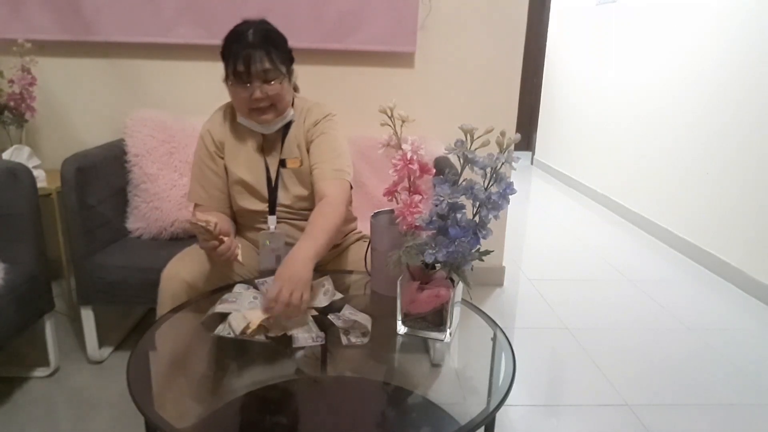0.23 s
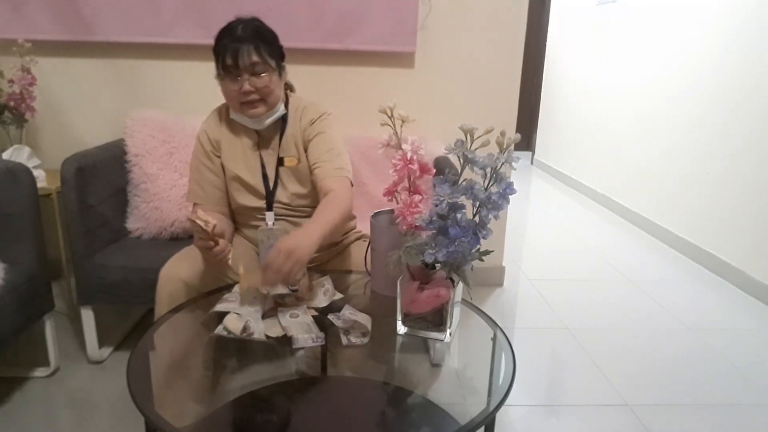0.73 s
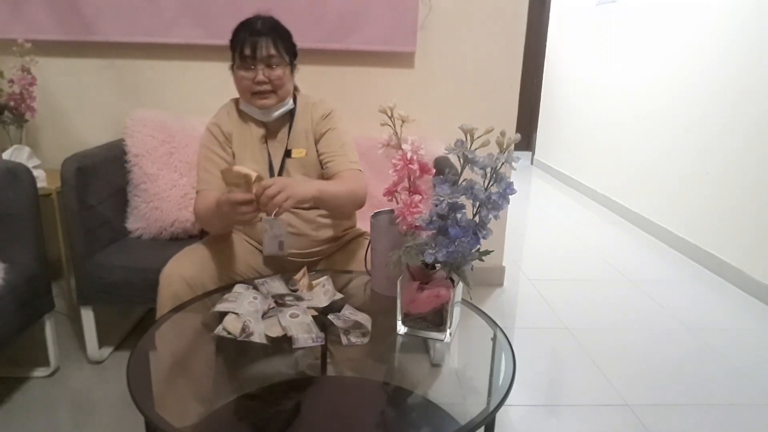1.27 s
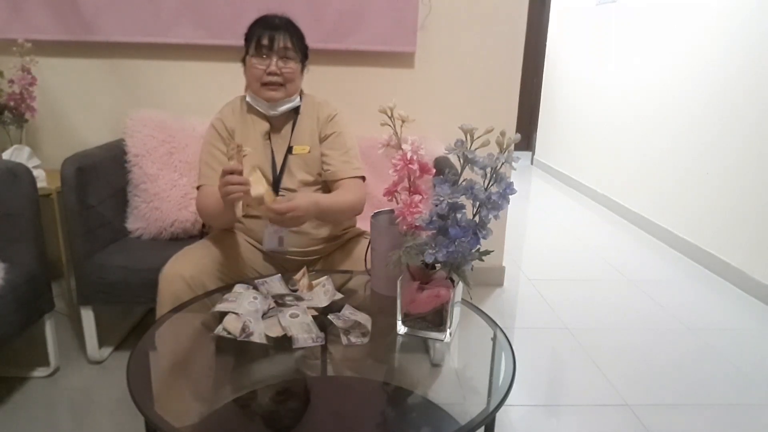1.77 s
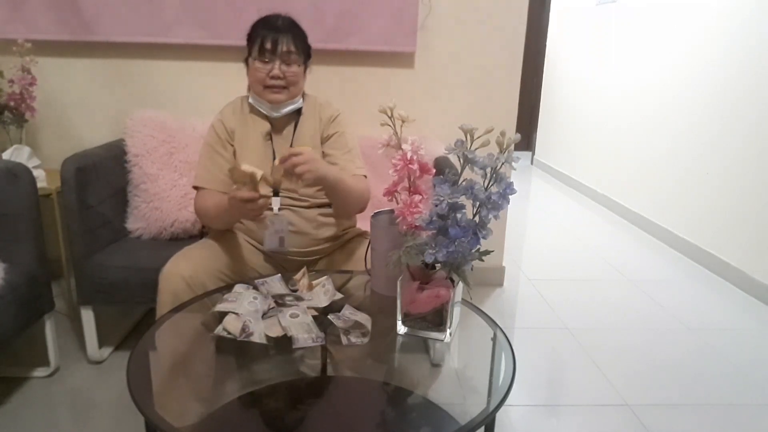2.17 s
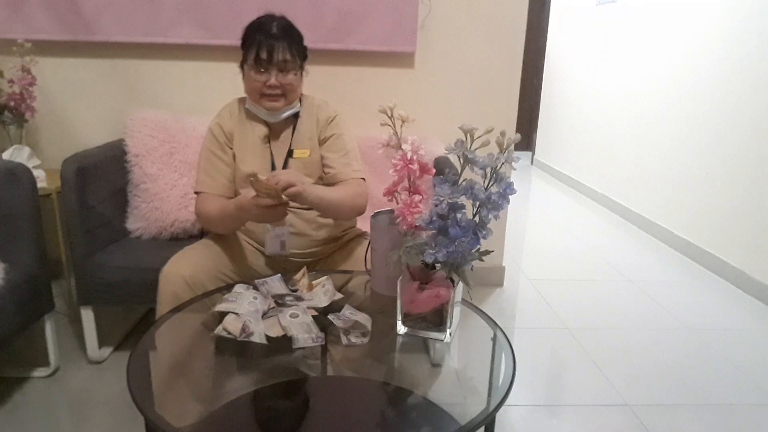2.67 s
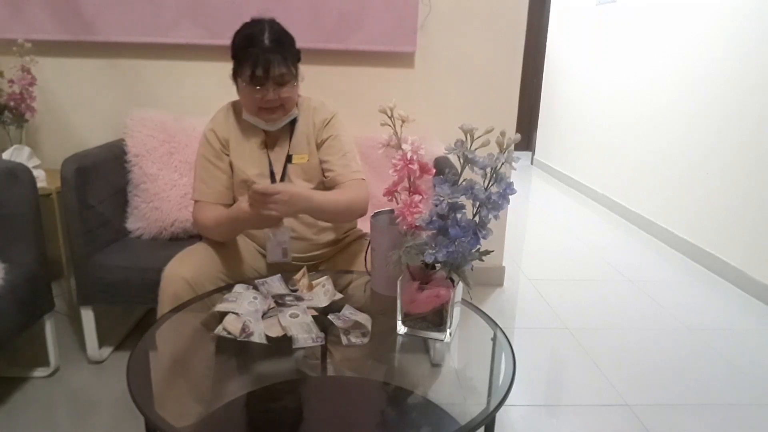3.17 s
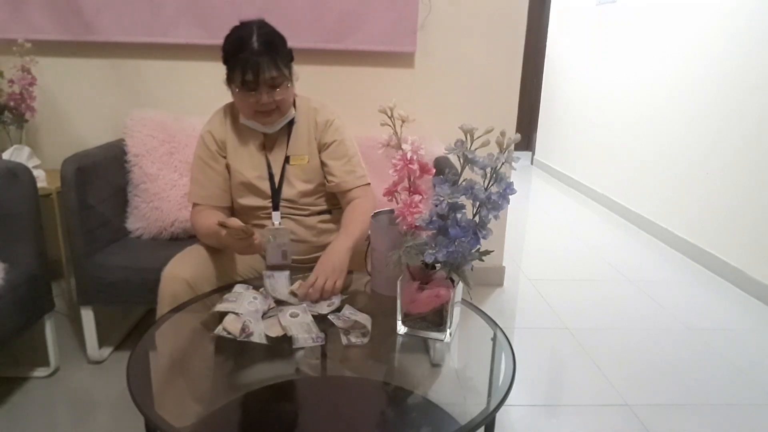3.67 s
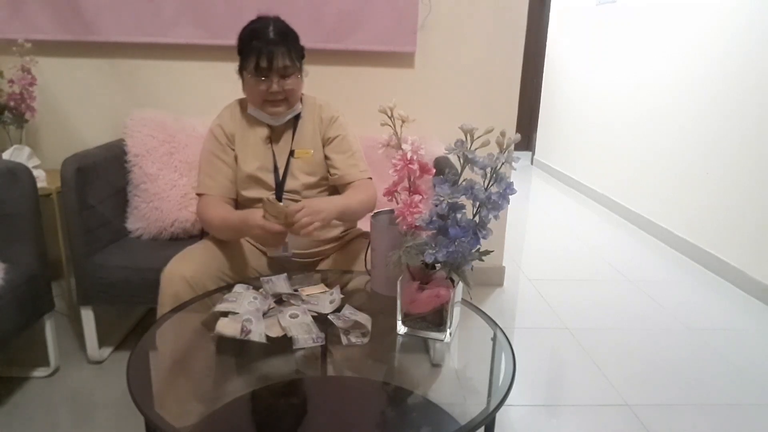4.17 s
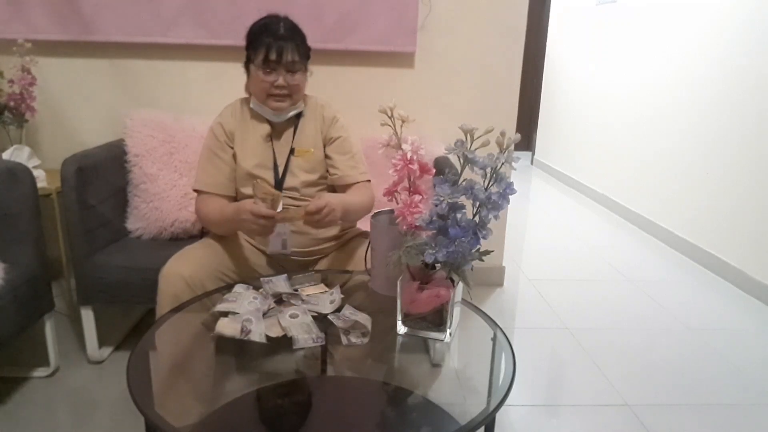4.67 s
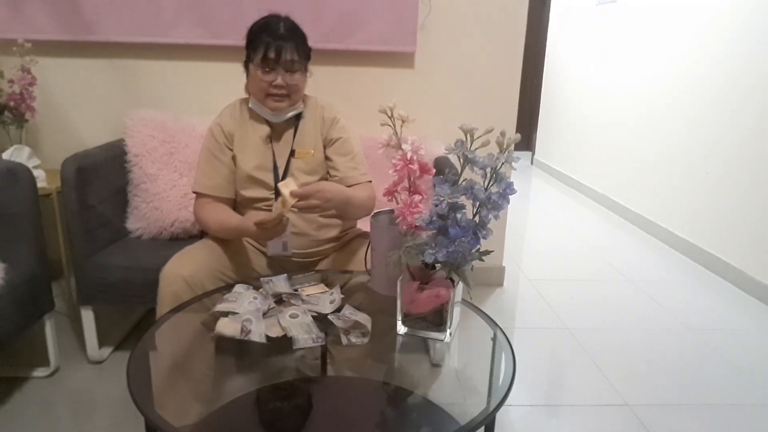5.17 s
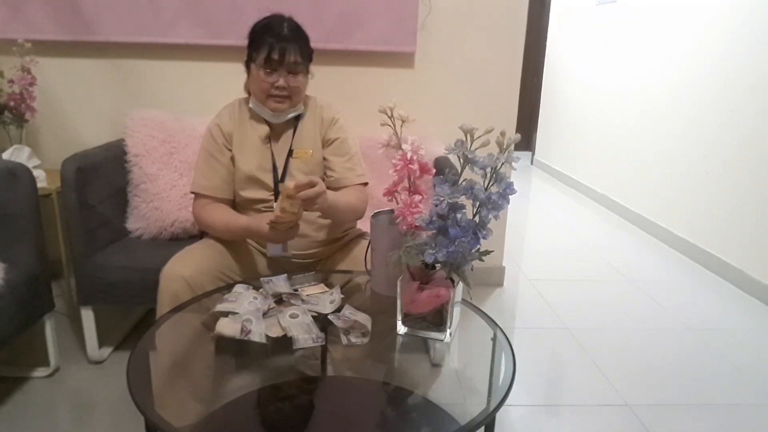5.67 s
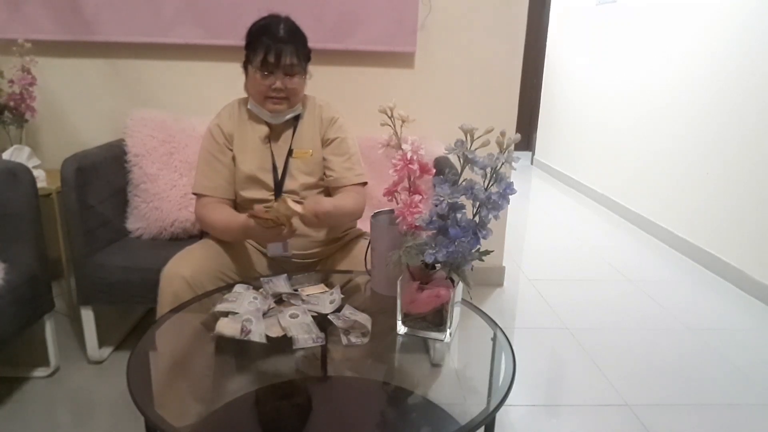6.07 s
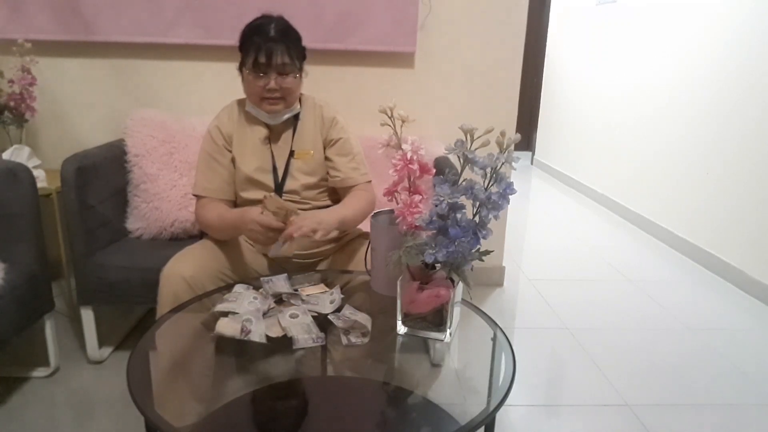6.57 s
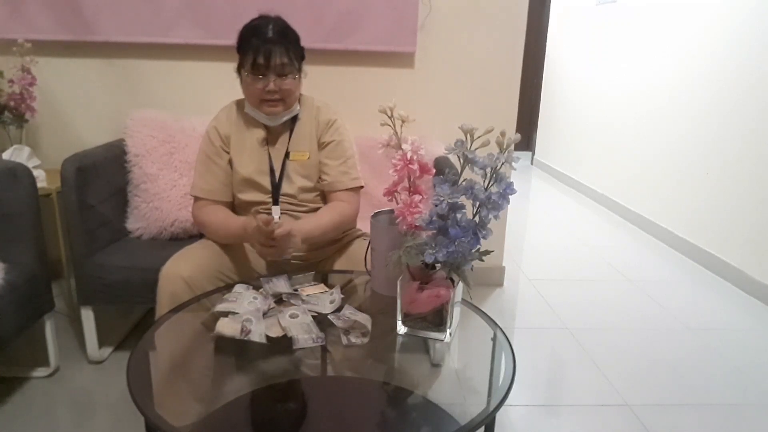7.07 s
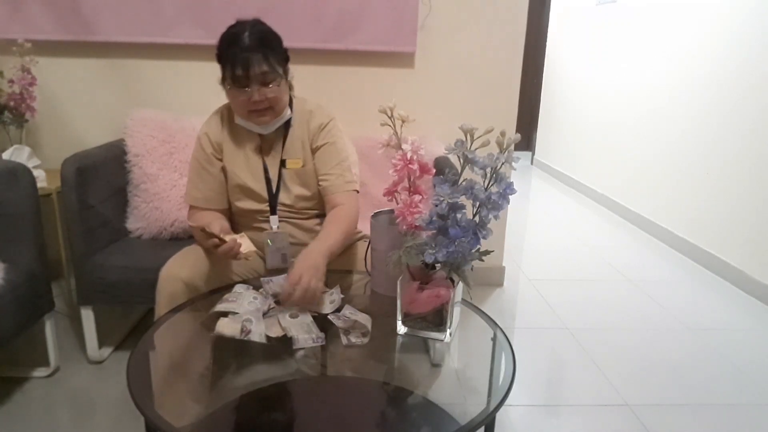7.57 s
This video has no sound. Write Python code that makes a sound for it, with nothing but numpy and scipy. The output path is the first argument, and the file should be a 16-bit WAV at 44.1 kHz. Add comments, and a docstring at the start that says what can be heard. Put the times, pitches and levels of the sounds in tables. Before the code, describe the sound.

Indoors in a hard, bare room, someone counts banknotes: short papery slides, fine crackle and sharp crease snaps in uneven rhythm. The busiest, loudest flurry comes early, with soft low thumps of the hand on table or bundle; later strokes are gentler with small gaps. Quiet air rush and a low drone continue throughout, heard at modest distance in mono.

```python
"""Bare tiled room: hands sort and count paper banknotes over a glass table, some steps from a mono microphone.
Notes slide and crumple (friction noise and crackle in four registers), creases snap (noise bursts ringing paper
panels), a hand bumps now and then (pushes ringing low modes); decaying noise tails make the room ring after each.
Underneath: the rush of ventilation and a low drone (filtered noise), and a wavering hum (two beating tones)."""
import sys
import numpy as np
from scipy import signal
from scipy.fft import rfft, irfft, next_fast_len
from scipy.io import wavfile
from scipy.ndimage import uniform_filter1d

SR = 44100
rng = np.random.default_rng(int(sys.argv[2]) if len(sys.argv) > 2 else 0)


def transcribe(u):
    """Save the signal u as a 16-bit wav file named by the first command-line argument.

    u: samples, shape (n,) or (channels, n), limited to [-1, 1]; the rate is SR.
    q: integer samples, one column per channel.
    """
    v = np.clip(np.atleast_2d(u).T, -1, 1)
    q = np.round(v * 32767).astype(np.int16)
    wavfile.write(sys.argv[1], SR, q)


N = 344421


def amp(db):
    """Amplitude factor of a level in dB."""
    return 10 ** (np.asarray(db) / 20)


def unit(x):
    """x scaled to an RMS of 1."""
    return x / np.sqrt(np.mean(x ** 2) + 1e-20)


def along(points, hz):
    """Interpolate (frequency [Hz], value) points on a log frequency axis."""
    point_hz, value = np.transpose(points)
    return np.interp(np.log(hz + 1), np.log(point_hz + 1), value)


def filtered(x, response):
    """x filtered by a complex response of frequency [Hz]."""
    m = next_fast_len(len(x) + SR // 4)
    spectrum = rfft(x, m) * response(np.fft.rfftfreq(m, 1 / SR))
    return irfft(spectrum, m)[:len(x)]


def coloured(x, colour):
    """x shaped by (frequency [Hz], level [dB]) points, at an RMS of 1."""
    return unit(filtered(x, lambda hz: amp(along(colour, hz))))


def resonances(modes, sign=-1):
    """Causal response of (Hz, width Hz, dB) modes; neighbours swing opposite unless sign is 1."""
    def response(f):
        return sum(sign ** k * amp(db) * 1j * f * width / (hz * hz - f * f + 1j * f * width)
                   for k, (hz, width, db) in enumerate(modes))
    return response


def patchy(patchy_db):
    """White noise with smooth patches of random gain in time and frequency, patchy_db RMS."""
    z = signal.stft(rng.standard_normal(N + 512), nperseg=512)[2]
    field = uniform_filter1d(rng.standard_normal(z.shape), 8, 0)
    field = uniform_filter1d(field, 16, 1)
    return signal.istft(z * amp(patchy_db * unit(field)), nperseg=512)[1][:N]


def ventilation():
    """Air rush as coloured noise, a drone of noise in narrow resonances, and a beating hum."""
    # rush spectrum: (frequency [Hz], level [dB per Hz])
    air = [(15, -71), (40, -30), (55, -1), (122, -14), (152, 3), (221, -10), (260, -6), (322, -13),
           (509, -31), (567, -34), (826, -15), (1080, -73), (2120, -47), (2300, -18.5), (2700, -39),
           (9000, -24), (15500, -44)]
    # drone modes, response squared in use: (frequency [Hz], width [Hz], level before squaring [dB])
    duct = [(67.5, 31, -5.5), (120.2, 13, 3.5), (199.2, 30, -4.5), (404, 100, -4)]
    # two close tones that beat: (frequency [Hz], RMS level [dB])
    tones = [(118, -80), (120.2, -72.5)]
    rush = coloured(patchy(patchy_db=1.0), air)
    drone = unit(filtered(patchy(patchy_db=2.5), lambda hz: resonances(duct)(hz) ** 2))
    t = np.arange(N) / SR
    hum = sum(amp(db) * np.sqrt(2) * np.sin(2 * np.pi * (hz * t + rng.random())) for hz, db in tones)
    return amp(-69) * rush + amp(-62.5) * drone + hum


def crackle(rate_per_s, spread_db):
    """Tiny creases: noise let through in bursts of a ms or two, some stronger than the rest."""
    excess_db = spread_db * np.minimum(rng.exponential(size=N), 2.5)
    sizes = (rng.random(N) < rate_per_s / SR) * amp(excess_db)
    decay = np.exp(-np.arange(400) / (0.0015 * SR))
    gate = signal.fftconvolve(sizes, decay)[:N]
    return unit(gate * rng.standard_normal(N))


def stroke_gain(start, length, hold_db, fade_db_per_s, rest_db):
    """Gain of one register: every stroke swells, holds and fades; their powers add."""
    attack_share, attack_db = 0.48, 17.5  # the first part of a stroke swells by this much
    start, length = start[:, None], length[:, None]
    t = np.arange(0, N / SR, .002)
    swell_db = attack_db * np.minimum((t - start) / (attack_share * length) - 1, 0)
    fade_db = fade_db_per_s * np.maximum(t - start - length, 0)
    shape_db = hold_db[:, None] + swell_db - fade_db
    power = (amp(shape_db) ** 2 * (t > start)).sum(axis=0) + amp(rest_db) ** 2
    return np.interp(np.arange(N) / SR, t, np.sqrt(power))


def slide():
    """Paper on paper: friction noise mixed with fine crackle, in the sheet's four registers."""
    # note on note: (start [s], length [s], flap of the whole sheet [dB], crumple of its panels [dB],
    # rustle [dB], hiss of the surface [dB])
    note_strokes = [(0.01, 0.07, -78, -60.5, -50.5, -50), (0.076, 0.054, -62, -50.5, -49, -41),
                    (0.143, 0.094, -60.5, -55, -46.5, -68), (0.457, 0.088, -59, -46, -40, -41),
                    (0.629, 0.13, -67, -54.5, -45, -47.5), (0.698, 0.059, -64.5, -52.5, -50, -43),
                    (0.837, 0.17, -65, -72, -64, -83), (1.169, 0.11, -57.5, -59, -55.5, -53.5),
                    (1.394, 0.12, -71, -64.5, -55, -51.5), (1.562, 0.075, -59.5, -53, -58, -52),
                    (1.656, 0.078, -44.5, -39.5, -38, -34), (1.856, 0.06, -48.5, -47, -54, -51.5),
                    (1.968, 0.11, -59, -56, -51, -49), (2.104, 0.1, -54, -51, -51, -44.5),
                    (2.287, 0.061, -59.5, -56, -61, -80), (2.472, 0.099, -60, -45.5, -64, -46.5),
                    (2.526, 0.16, -55.5, -47, -56.5, -66), (2.751, 0.11, -52.5, -48.5, -43.5, -43.5),
                    (3.128, 0.053, -79, -55.5, -50, -50), (3.294, 0.063, -94, -58, -60, -52),
                    (3.572, 0.12, -87, -77, -60, -60), (3.645, 0.13, -57.5, -57, -52.5, -52),
                    (3.804, 0.065, -53.5, -57, -51.5, -50), (4.03, 0.17, -72.5, -90, -73, -64.5),
                    (4.231, 0.17, -59.5, -56, -51, -51.5), (4.375, 0.096, -53, -53, -51, -46),
                    (4.57, 0.35, -77.5, -75, -66, -67), (4.907, 0.088, -54, -53, -77, -60),
                    (5.054, 0.11, -62, -54.5, -53.5, -62), (5.235, 0.09, -67, -59.5, -60, -64.5),
                    (5.309, 0.1, -65.5, -57.5, -57, -49.5), (5.544, 0.04, -68.5, -58.5, -57.5, -54.5),
                    (5.582, 0.082, -57.5, -54, -47, -46.5), (6.087, 0.048, -85, -74.5, -62, -54.5),
                    (6.159, .05, -82, -68, -60.5, -55), (6.185, 0.077, -69, -58.5, -68, -68),
                    (6.308, 0.051, -70.5, -58, -59.5, -57.5), (6.404, 0.02, -69, -62, -62.5, -52),
                    (6.513, 0.12, -71, -78, -96, -92), (6.672, .12, -65, -70, -66, -59),
                    (6.777, 0.12, -58.5, -57.5, -57, -57.5), (7.023, 0.05, -70, -51.5, -52, -49),
                    (7.039, 0.17, -53, -54, -55.5, -57), (7.303, 0.11, -72, -57, -52.5, -51),
                    (7.395, 0.072, -63, -59, -52.5, -50), (7.775, 0.11, -71, -66, -53, -49)]
    # register spectra: (frequency [Hz], level [dB per Hz])
    flap = [(200, -13.5), (400, 1.5), (800, -0.5), (1200, 0.5), (1800, -3.5), (4000, -58)]
    crumple = [(700, -10), (1300, -1.5), (2100, 7), (2900, 5.5), (4200, -6.5), (8000, -53.5)]
    rustle = [(1500, -100), (2900, -12.5), (3800, 0.5), (5200, 1.5), (6300, -5), (8500, -13),
              (12000, -79.5)]
    hiss = [(4000, -63), (7000, -3.5), (9000, 0), (10500, -3), (12500, 0), (15500, -6)]
    # fade after a stroke: (flap, crumple, rustle, hiss [dB/s])
    fades_db_per_s = (90, 120, 140, 400)
    # fingers never lie quite still: (flap, crumple, rustle, hiss [dB])
    rests_db = (-85, -87, -76, -95)
    start, length, *levels_db = np.transpose(note_strokes)
    grit = crackle(rate_per_s=300, spread_db=4.2)
    layers = [coloured(patchy(patchy_db=2.5) + .9 * grit, colour)
              for colour in (flap, crumple, rustle, hiss)]
    return sum(stroke_gain(start, length, *shape) * layer
               for *shape, layer in zip(levels_db, fades_db_per_s, rests_db, layers))


def snaps():
    """Each crease gives way in a few ms and rings two panels of paper: straight ahead, and all round."""
    # creases: (time [s], peak level ahead [dB], level all round relative to it [dB],
    # low ring [Hz], high ring [Hz], high-ring mode relative to low [dB])
    creases = [(0.0301, -40, -14, 2950, 5300, 23), (0.0537, -39.5, -19, 3350, 3620, 22),
               (0.1005, -33.5, -12.5, 3000, 3600, -23), (0.1655, -25, -13.5, 2210, 3850, -11),
               (0.1705, -23, -20, 2280, 3840, 1), (0.442, -41.5, -17, 2300, 9150, 3),
               (0.472, -23.5, -27, 3330, 4700, 14), (0.5133, -22.5, -32, 2240, 5540, 8),
               (0.5362, -22, -22, 2760, 5030, 6), (0.7142, -38, -4.5, 3100, 3800, 13),
               (1.1876, -24, -18.5, 3800, 4130, -12), (1.459, -40, -7, 2100, 2880, 1),
               (1.4649, -32, -24, 4870, 8000, 8), (1.6075, -35.5, -16, 3300, 3600, -5),
               (1.634, -33, -21, 3270, 3960, -15), (1.6558, -26.5, -31, 2220, 3670, -3),
               (1.6692, -22.5, -19, 1890, 3700, -2), (1.6829, -13.5, -24, 3500, 5840, 1),
               (1.718, -15, -16, 1590, 4000, -8.5), (1.7343, -25, -34, 2240, 3620, -1),
               (1.759, -27, -16, 3170, 5200, -1), (1.8935, -22.5, -17.5, 1390, 4480, -4),
               (1.926, -29, -27, 3300, 4870, 14), (2.0373, -30.5, -19, 1350, 4900, -3),
               (2.0525, -27.5, -22, 1800, 5340, -20), (2.138, -20, -22, 1590, 4730, 1),
               (2.2383, -25.5, -18, 1970, 4500, -17), (2.345, -37.5, -17.5, 2450, 3580, -15),
               (2.4717, -33.5, -16, 1620, 3900, 6), (2.5082, -22, -19.5, 2730, 3950, -9),
               (2.5732, -28, -9.5, 3060, 4240, -2), (2.6061, -21.5, -20, 2450, 3900, 4),
               (2.8099, -25, -13, 2900, 3770, -22), (3.1498, -25.5, -20, 2440, 6700, 1),
               (3.363, -36.5, -14, 2230, 4500, 0), (3.5923, -48.5, -12, 2430, 4630, 5),
               (3.6753, -38.5, -12, 2600, 4500, 12), (3.75, -32.5, -15.5, 2580, 3740, -4),
               (3.793, -35, -32, 3300, 4310, 3), (3.8683, -35.5, -13, 3230, 4480, -3),
               (4.101, -40.5, -14.5, 3350, 3930, -15), (4.275, -37, -18, 3130, 4800, 4),
               (4.94, -32, -16.5, 1400, 4870, -3), (5.0433, -30, -12.5, 2720, 3200, -10),
               (5.1, -23, -21.5, 2340, 4800, 1), (5.1216, -27.5, -21, 2800, 4400, 24),
               (5.3882, -28, -19, 1950, 5650, 1.5), (5.5998, -28.5, -19, 4850, 9200, 9),
               (6.2048, -37, -14, 2240, 4150, -1), (6.4252, -44, -21, 2740, 5680, 4),
               (6.589, -50.5, -16, 875, 3620, -23), (6.738, -43, -14.5, 2980, 4650, -14),
               (6.817, -32.5, -18.5, 2280, 3280, -5), (6.8599, -32, -15.5, 1240, 4080, -21),
               (7.033, -54, -18, 4600, 9000, 3), (7.1138, -29, -17.5, 1560, 4820, -30),
               (7.7773, -48, -8, 3540, 4140, 12)]
    snap_ms, snap_scatter = 2.8, 0.2  # median 1/e time of the burst, its log spread
    body_db, edge_db, edge_grows = -26.5, -17.5, 0.21  # bright snaps have more edge
    edge_ahead_db = 7  # the treble of the edge beams forward
    stored = np.sqrt(SR * .75 / np.log(1e6))  # the energy is spread over the decay of the room
    ahead, around = np.zeros(N + SR), np.zeros(N + SR)
    t = np.arange(SR // 40) / SR
    for time_s, peak_db, walls_db, low_hz, high_hz, high_db in creases:
        panels = resonances([(900, 700, body_db), (low_hz, 0.13 * low_hz, 0), (4200, 5000, -10),
                             (high_hz, .2 * high_hz, high_db)], sign=1)
        edge = resonances([(12400, 2200, edge_db + edge_grows * high_db)])

        def paper(f, beam=1):
            limp = (1 + 1j * f / 9000) ** 2  # the panels are too limp for the top octave
            return panels(f) / limp + beam * edge(f)

        ms = snap_ms * np.exp(snap_scatter * rng.standard_normal())
        burst = rng.standard_normal(len(t)) * np.exp(-(1000 * t / ms) ** 2)
        snap = filtered(burst, lambda f: paper(f, beam=amp(edge_ahead_db)))
        at = round(time_s * SR)
        ahead[at:][:len(t)] += amp(peak_db) * snap / np.abs(snap).max()
        # summed over all directions the chance ripples of the burst average out, the rings remain
        mean = filtered((t == 0) + .5 * burst / np.linalg.norm(burst), paper)
        around[at:][:len(t)] += amp(peak_db + walls_db) * stored * mean / np.linalg.norm(mean)
    return ahead[:N], around[:N]


def bumps():
    """A soft push of some ms by the hand sets the table and the bundle ringing low."""
    # pushes: (time [s], level before the common trim [dB], boost of the lowest mode [dB])
    pushes = [(1.629, -38, 3), (1.702, -35.5, 6), (1.75, -43, 9), (2.247, -46.5, -4), (2.601, -39, -12),
              (2.829, -39, 1.5), (3.713, -31.5, 9), (3.738, -32, 5), (3.781, -46, 11), (4.428, -47, -2),
              (4.937, -47, -12), (5.721, -49, 18), (6.347, -44, -10)]
    # table and bundle: (frequency [Hz], width [Hz], level, the lowest before its boost [dB])
    modes = [(190, 26, -2), (350, 25.6, 3.5), (513, 170, -9)]
    trim_db = -3.5
    out, t = np.zeros(N + SR), np.arange(SR // 5) / SR
    (hz, width_hz, db), *upper = modes
    for time_s, level_db, low_db in pushes:
        push = 9 * (t == 0) + np.exp(-t / 0.012) * rng.standard_normal(len(t))
        ring = filtered(push, resonances([(hz, width_hz, db + low_db), *upper]))
        out[round(time_s * SR):][:len(t)] += amp(level_db + trim_db) * ring / np.abs(ring).max()
    return out[:N]


def room(x):
    """Table and floor answer more weakly, then the walls in full, each frequency dying at its own speed."""
    # decay: (frequency [Hz], T60 [s])
    decay = [(200, 0.87), (1000, 0.45), (3000, 0.67), (7000, 0.68), (14000, 0.81)]
    out, step = np.zeros(N + 2 * SR), SR // 10
    for start in range(0, N, step):  # the hands keep moving, so the fine pattern of echoes keeps changing
        hz, t, z = signal.stft(rng.standard_normal(SR), SR, nperseg=256)
        t60_s = along(decay, hz)[:, None]
        tail = signal.istft(z * amp(-60 * t / t60_s), SR, nperseg=256)[1]
        tail_s = np.arange(len(tail)) / SR
        tail *= 0.7 + 0.3 / (1 + np.exp(-(tail_s - .006) / .002))  # full strength after some ms
        tail = np.pad(tail / np.linalg.norm(tail), (150, 0))  # delay in samples
        echo = signal.fftconvolve(x[start:start + step], tail)
        out[start:][:len(echo)] += echo
    return out[:N]


def scene():
    """Direct paper and hand sounds, their room answer and the ventilation; one capsule feeds both channels."""
    ahead, around = snaps()
    soft = slide() + bumps()
    mono = ahead + soft + room(around + amp(-2) * soft) + ventilation()
    return np.array([mono, mono])


def record(dry):
    """The capsule loses the deepest bass; nothing is kept above the band limit."""
    bass_hz, top_hz = 35, 15700

    def capsule(hz):
        bass_cut = 1j * hz / (bass_hz + 1j * hz)
        return bass_cut ** 2 * (hz < top_hz)

    return np.array([filtered(x, capsule) for x in dry])


dry = scene()
out = record(dry)
transcribe(out)
```